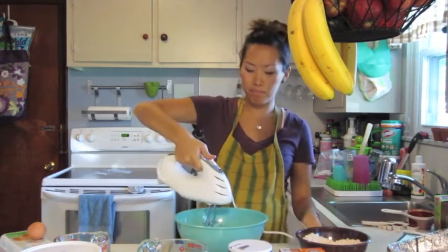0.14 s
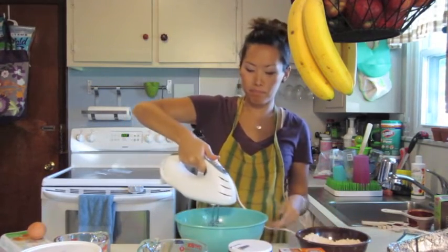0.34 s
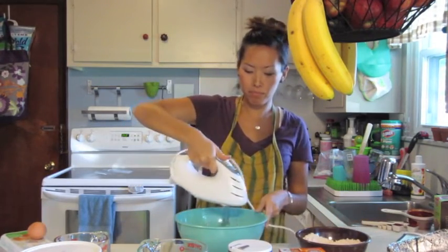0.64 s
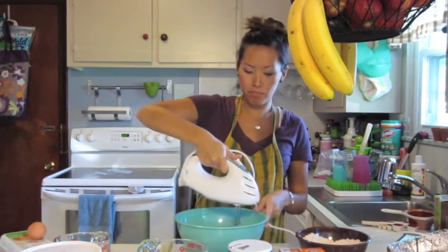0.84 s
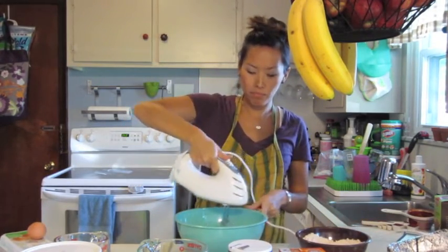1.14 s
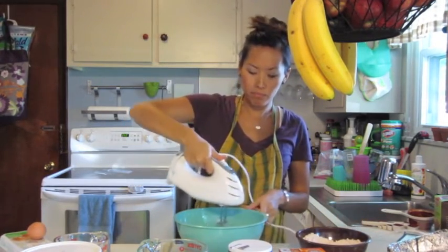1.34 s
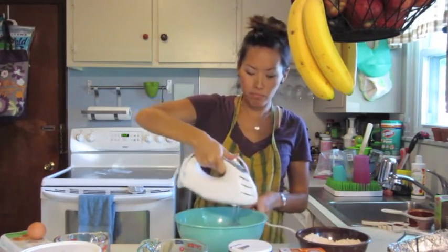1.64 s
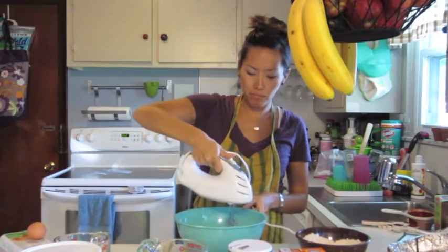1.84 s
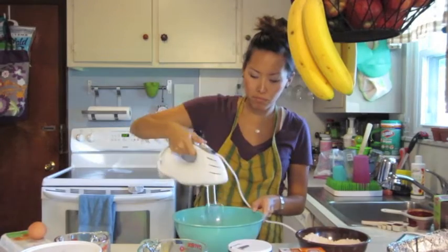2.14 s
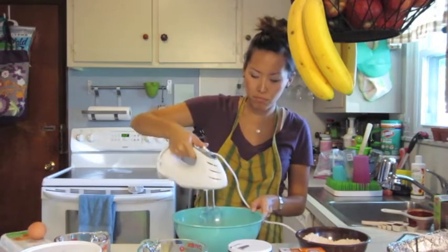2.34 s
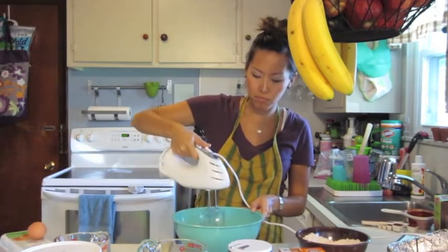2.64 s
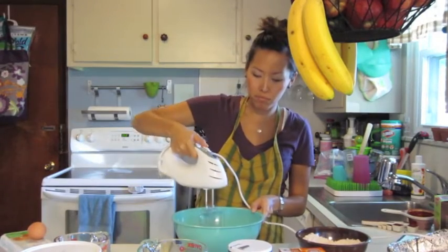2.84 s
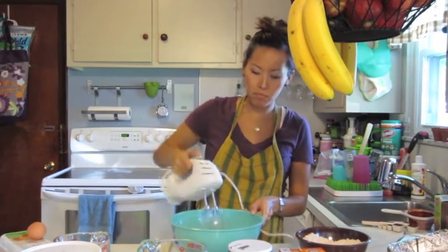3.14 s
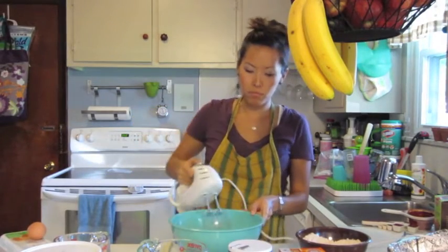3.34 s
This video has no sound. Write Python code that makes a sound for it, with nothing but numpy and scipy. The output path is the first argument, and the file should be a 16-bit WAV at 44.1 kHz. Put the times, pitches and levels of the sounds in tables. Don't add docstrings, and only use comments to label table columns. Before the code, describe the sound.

Faint kitchen hum, then at 0.1 s a switch clicks and a handheld mixer's motor whines upward, buzzing with gear noise and airy rush. From 0.8 to 2 s beaters knock rapidly on a plastic bowl, easing around 1.3 s, over low counter rumble. A quick fade at 2.07 s leads to a coasting motor; at 2.36 s it clicks on, revs until 2.83 s, then winds down with gear whir by 3.5 s.

```python
import sys
import numpy as np
from scipy import signal
from scipy.fft import rfft, irfft
from scipy.io import wavfile
from scipy.ndimage import uniform_filter1d

SR = 44100
rng = np.random.default_rng(int(sys.argv[2]) if len(sys.argv) > 2 else 0)


def invert_db(level):
    return 10 ** (np.asarray(level, dtype=float) / 20)


def put_to_file(sound):
    columns = np.atleast_2d(sound).T
    safe = np.clip(columns, -1, 1)
    whole_steps = np.round(safe * 32767)
    wavfile.write(sys.argv[1], SR, whole_steps.astype(np.int16))


N = 154350
JOIN_S = 2.069
MAINS_RIPPLE_HZ = 120.86


def level(x, db):
    return x * invert_db(db) / np.sqrt(np.mean(x ** 2))


def band(x, hz, width_hz):
    return signal.lfilter(*signal.iirpeak(hz, max(hz / width_hz, .6), fs=SR), x)


def shaped(x, points):
    point_hz, point_db = np.array(points, float).T
    hz = np.arange(N // 2 + 1) * SR / N + 1
    return irfft(rfft(x) * invert_db(np.interp(np.log(hz), np.log(point_hz), point_db)), N)


def coloured(points):
    return level(shaped(rng.standard_normal(N), points), 0)


def walk(rate_hz):
    hold = int(SR / rate_hz)
    steps = np.repeat(rng.standard_normal(N // hold + 1), hold)
    return 1.18 * uniform_filter1d(uniform_filter1d(steps, hold), hold)[:N]


def control(t, column):
    # time_s, whine_hz
    first_speed = [(0, 300), (.108, 300), (.15, 560), (.24, 700), (.3, 920), (.4, 1190), (.5, 1470),
                   (.6, 1650), (.75, 1840), (.9, 1960), (1.05, 2095), (1.2, 2190), (1.3, 2248), (1.4, 2298),
                   (1.49, 2345), (1.62, 2325), (1.8, 2364), (2.07, 2380)]
    # rush_db, gear_db, whine_db
    first_levels = [(-52.5, -47, -83), (-71, -56.5, -69), (-66, -37.5, -38), (-43, -29.5, -28),
                    (-49.5, -33.5, -31), (-45.5, -35, -31.5), (-43.5, -36.5, -33.5), (-41.5, -31.5, -34.5),
                    (-41.5, -31, -35.5), (-38.5, -32, -33.5), (-39, -34.5, -35.5), (-39, -30.5, -31),
                    (-37.5, -30, -33.5), (-36.5, -30.5, -30), (-36.5, -29.5, -32.5), (-34, -29.5, -34.5),
                    (-36.5, -31, -34.5), (-35.5, -25, -29.5)]
    # time_s, whine_hz
    second_speed = [(2.07, 900), (2.2, 700), (2.358, 700), (2.366, 860), (2.44, 1150), (2.53, 1570),
                    (2.6, 1780), (2.7, 2080), (2.78, 2330), (2.83, 2450), (2.9, 2350), (3.05, 1900),
                    (3.2, 1450), (3.35, 1000), (3.5, 600)]
    # rush_db, gear_db, whine_db
    second_levels = [(-51.5, -43, -66), (-54, -40.5, -78), (-65.5, -48, -52), (-46.5, -39, -32.5),
                     (-49.5, -39.5, -31.5), (-45, -36.5, -32), (-42, -33.5, -31.5), (-40, -30, -33),
                     (-37.5, -31.5, -32.5), (-37, -29, -42), (-40.5, -32.5, -52), (-44, -34, -67),
                     (-49, -34.5, -80), (-54, -42, -80), (-64, -46.5, -80)]
    axis = ["time_s", "whine_hz", "rush_db", "gear_db", "whine_db"].index(column)
    a = np.hstack([first_speed, first_levels])
    b = np.hstack([second_speed, second_levels])
    return np.where(t < JOIN_S, np.interp(t, a[:, 0], a[:, axis]), np.interp(t, b[:, 0], b[:, axis]))


def room_tone():
    # freq_hz, density_db
    spectrum = [(25, -3), (70, -11.5), (152, 4.5), (331, 2.5), (660, 2.5), (979, -2), (2500, -17),
                (16000, -38)]
    return level(coloured(spectrum), -43)


def mains_hum(ripple, on):
    motor_db, fridge_db = -45, -47
    return (on * invert_db(motor_db) + invert_db(fridge_db)) * invert_db(2.2 * walk(6)) * np.sin(2 * ripple)


def gears(t):
    # freq_hz, width_hz, level_db
    housing = [(245, 60, -13), (420, 120, -10), (520, 60, -5), (590, 36, -1), (673, 40, 1), (835, 70, -6),
               (996, 32, 2), (1130, 90, -6), (1410, 150, -11), (1740, 180, -8), (2200, 200, -12),
               (2900, 300, -15), (3400, 300, -19)]
    tooth_scatter_db = 2
    grip_hz, grip_db = 996, -5
    slow_dull_db = 2
    clicks = rng.standard_normal(N) * invert_db(tooth_scatter_db * rng.exponential(1, N)) * invert_db(1.5 * walk(60))
    slow_db = slow_dull_db * np.log2(control(t, "whine_hz") / 2300)
    body = 0
    for k, (hz, width_hz, db) in enumerate(housing):
        grip = grip_db * (hz == grip_hz) * (t < JOIN_S)
        dull = slow_db * max(np.log2(hz / 1000), 0)
        mode = band(band(clicks, hz, 2 * width_hz), hz, 2 * width_hz)
        body = body + (-1) ** k * invert_db(db + grip + 0.6 * walk(25.1) + dull) * mode
    return level(body, 0) * invert_db(control(t, "gear_db") + 2.5)


def rush(t, ripple, on):
    # freq_hz, density_db
    spectrum = [(60, -40), (300, -10), (1470, -9), (2600, -5), (3960, -11), (4900, -12), (5900, -9.5),
                (9700, -22.5), (16000, -20)]
    flicker_db, brush_gate = .8, .06
    edges_hz = [0, 1500, 3000, 5000, 8000, 11500, SR]
    air = rfft(coloured(spectrum))
    hz = np.arange(N // 2 + 1) * SR / N
    shared = walk(16)
    flow = 0
    for low, high in zip(edges_hz, edges_hz[1:]):
        flow = flow + irfft(air * (hz >= low) * (hz < high), N) * invert_db(flicker_db * (shared + walk(30.28)))
    return flow * (1 + brush_gate * on * np.sin(ripple)) * invert_db(control(t, "rush_db") + 3)


def ticks(t):
    # start_s, peak_db, tail_s, wire_ring_db
    events = [
        (0.1103, -38.5, 0.046, -58),
        (.21, -42, 0.034, -56),
        (0.319, -47, .015, -52),
        (0.366, -41.5, 0.013, -52),
        (.412, -41.5, .02, -49),
        (0.907, -43, .003, -42),
        (0.9668, -33.5, 0.018, -28.5),
        (1.58, -36, 0.011, -33),
        (2.363, -35.5, 0.035, -50),
        (3.2159, -41, .02, -43.5),
    ]
    # freq_hz, t60_s, level_db
    wire_modes = [(3050, .16, 0), (3280, .12, -2), (3750, .03, -1), (4300, .02, 0), (5900, .04, -6)]
    snap_db, snap_s = 4, .001
    shape, strikes, ring_s = np.zeros(N), np.zeros(N), t[:SR // 4]
    for start_s, db, tail_s, ring_db in events:
        since = np.abs(t - start_s)
        decay = np.exp(-since / tail_s) + invert_db(snap_db) * np.exp(-since / snap_s)
        shape += invert_db(db) * (t > start_s) * decay
        strikes[int(start_s * SR)] = invert_db(ring_db)
    wire = sum(invert_db(db - 60 * ring_s / t60) * np.sin(2 * np.pi * hz * ring_s) for hz, t60, db in wire_modes)
    noise = rng.standard_normal(N)
    snap = level(band(noise, 7500, 6000), -9.5) + level(band(noise, 2600, 3300), -5.5)
    return shape * snap + signal.fftconvolve(strikes, wire)[:N]


def counter(t):
    # time_s, level_db
    shake = [(.2, -62), (.26, -47.5), (.6, -39), (.8, -39), (.98, -35.5), (1.3, -42), (1.5, -38),
             (1.7, -31), (1.9, -38.5)]
    # freq_hz, width_hz, level_db
    resonances = [(31.3, 8.1, -5), (70.3, 15.6, 2.5), (90, 7.3, -7), (174, 34, -9.5)]
    thrum = 0
    for hz, width_hz, db in resonances:
        thrum = thrum + invert_db(db) * band(band(rng.standard_normal(N), hz, width_hz), hz, 2 * width_hz)
    time_s, shake_db = np.transpose(shake)
    gate = (t < JOIN_S) * np.clip((t - .12) / 0.08, 0, 1)
    return level(thrum, 0) * invert_db(np.interp(t, time_s, shake_db)) * gate


def whine(t, ripple):
    sidebands = [-14, -12, -7, -3, 0, -7, -15]
    # freq_hz, width_hz, level_db
    resonances = [(660, 102, 8.5), (890, 80, 2.5), (1004, 70, 5.5), (1138, 76, 5), (1418, 41, -3.5),
                  (1543, 46, 3), (1780, 170, 5.5), (1932, 67, 0.5), (2130, 91, 1.5), (2270, 98, 3),
                  (2387, 110, 6), (2650, 110, -4)]
    wander_db, floor_db, jitter, load_spread = 2, -10, .04, .5
    octave_db, octave_fades_hz = -7, 1450
    hz = control(t, "whine_hz")
    slew_hz_per_s = np.abs(uniform_filter1d(np.gradient(hz) * SR, size=4000))
    unsteady = np.clip(slew_hz_per_s / 2500, .02, 1) ** 1.15
    spread = 1 - load_spread * unsteady ** .5 * np.clip(hz / octave_fades_hz - .5, 0, 1)
    octave_gain = np.clip((octave_fades_hz - hz) / 150, 0, 1)
    tone = 0
    for k, db in enumerate(sidebands, start=-4):
        db = db * spread
        phase = 2 * np.pi * np.cumsum(hz * (1 + jitter * unsteady * walk(80))) / SR
        tone = tone + invert_db(db + wander_db * walk(21.48)) * np.sin(phase + k * ripple)
        octave = invert_db(db + octave_db + wander_db * walk(24.9)) * np.sin(2 * phase + k * ripple)
        tone = tone + octave_gain * octave
    tone = tone * invert_db(control(t, "whine_db"))
    body = sum(invert_db(db - 3.5) * band(tone, f, width_hz) for f, width_hz, db in resonances)
    return invert_db(floor_db) * tone + body


def squeal(t):
    start_s, end_s, ramp_s = 0.18, 0.372, 0.047
    gate = np.clip(np.minimum(t - start_s, end_s - t) / ramp_s, 0, 1)
    return gate * level(band(rng.standard_normal(N), 7300, 300), -47.5)


def bowl(t):
    # start_s, peak_db, wall_pitch_hz
    knocks = [(0.829, -14, 660.0), (0.849, -18, 735), (0.856, -11.5, 544), (0.886, -13, 655),
              (0.895, -16.0, 600), (0.915, -16, 630), (0.946, -8, 648), (0.975, -8.5, 697),
              (0.984, -15.5, 694), (1.002, -15.5, 630.0), (1.024, -22, 660), (1.041, -14.5, 623),
              (1.059, -28, 660.0), (1.075, -10, 612), (1.099, -17, 590), (1.107, -19, 638),
              (1.129, -19, 617), (1.153, -17, 637), (1.169, -17, 656), (1.2, -21, 630.0),
              (1.234, -18.5, 663), (1.245, -19, 650.0), (1.261, -33, 600.0), (1.329, -23, 640),
              (1.341, -20.0, 613), (1.356, -22, 540), (1.429, -22.0, 720), (1.461, -28, 730.0),
              (1.481, -18.5, 610), (1.498, -15.5, 719), (1.525, -14, 735), (1.542, -9.5, 629),
              (1.57, -13.0, 706), (1.585, -9.5, 615), (1.595, -18.5, 660.0), (1.611, -11.5, 690),
              (1.641, -12, 660.0), (1.65, -17, 766), (1.667, -9, 640), (1.681, -12.5, 656),
              (1.69, -16, 746), (1.704, -12.5, 620.0), (1.713, -19, 665), (1.736, -10.5, 620.0),
              (1.751, -29, 610), (1.76, -20, 590.0), (1.779, -18.0, 642), (1.79, -17.0, 630),
              (1.798, -19, 693), (1.822, -17.5, 780.0), (1.836, -23, 683), (1.849, -10.5, 631),
              (1.858, -21, 650.0), (1.879, -12.5, 590.0), (1.905, -14.0, 670.0), (1.92, -12, 633),
              (1.937, -20, 614), (1.952, -14.5, 640.0), (1.963, -15, 602), (1.987, -13, 620.0)]
    # freq_hz, level_db, t60_s
    modes = [(165.2, -11, 0.85), (253, 1.5, 0.065), (297, -1, 0.071), (472.5, -7.5, 0.15), (554, 6, 0.053),
             (590, 1.5, 0.058), (682, -1.5, 0.072), (757, -14, 0.064), (814, 5, 0.11), (1130, -43, 0.034),
             (3020, -5, 0.026), (5760, -28, 0.033)]
    rise_s, fall_s, thump_db = .0022, .0035, -4.5
    ring_db, ring_rise_s, phase_scatter = -18, .003, .1
    scrape_db, scrape_s = -16, 0.029
    out, push, ring_s = np.zeros(N), np.zeros(N), t[:SR // 5]
    mode_hz, mode_db, mode_t60_s = np.transpose(modes)[..., None]
    chance = rng.standard_normal((len(knocks), len(modes), 3))
    late = ring_s - 3 * rise_s
    swell = np.exp(-np.where(late < 0, (late / rise_s) ** 2, (late / fall_s) ** 2) / 2)
    scrape_decay = (late > 0) * np.exp(-np.abs(late) / scrape_s)
    for (start_s, db, wall_hz), c in zip(knocks, chance):
        detuned_hz = mode_hz * (1 + 0.017 * c[:, :1])
        tone = np.sin(2 * np.pi * (detuned_hz * ring_s + phase_scatter * c[:, 1:2]))
        ring = (invert_db(mode_db + 1.8 * c[:, 2:]) * tone * invert_db(-60 * ring_s / mode_t60_s)).sum(axis=0)
        ring = ring * (1 - np.exp(-ring_s / ring_rise_s)) * invert_db(ring_db)
        thump = invert_db(thump_db) * swell * np.sin(2 * np.pi * wall_hz * ring_s)
        at = int((start_s - 3 * rise_s) * SR)
        out[at:at + len(ring_s)] += (ring + thump) * invert_db(db)
        push[at:at + len(ring_s)] += invert_db(db) * scrape_decay
    noise = rng.standard_normal(N) * invert_db(1.6 * walk(90))
    scrape = sum(invert_db(db) * band(band(noise, hz, 6 / t60 + 0.042 * hz), hz, hz) for hz, db, t60 in modes)
    return out + level(scrape, scrape_db) * push


def kitchen_echo(t, dry):
    t60_s, echo_db = .3, -13
    tail_s = t[:SR // 2]
    decay = invert_db(-60 * tail_s / t60_s) * (tail_s > .006)
    echo = level(band(rng.standard_normal(len(tail_s)), 1760, 3600 ) * decay, 0)
    echo = echo * invert_db(echo_db) / np.sqrt(len(tail_s))
    first = t < JOIN_S
    wet_first = first * signal.fftconvolve(dry, echo)[:N]
    wet_second = signal.fftconvolve(dry * ~first, echo)[:N]
    return wet_first + wet_second


def scene():
    # start_s, end_s
    power = [
        (.11, 2.07),
        (2.362, 2.83),
    ]
    t = np.arange(N) / SR
    ripple = 2 * np.pi * MAINS_RIPPLE_HZ * t
    on = uniform_filter1d(sum(1. * (t > start_s) * (t < end_s) for start_s, end_s in power), size=900)
    mixer = gears(t) + rush(t, ripple, on) + whine(t, ripple)
    dry = mains_hum(ripple, on) + mixer + ticks(t) + squeal(t) + bowl(t)
    return (dry + kitchen_echo(t, dry) + counter(t) + room_tone())[None]


def low_pass(x):
    return signal.sosfilt(signal.butter(12, 15830, fs=SR, output="sos"), x)


def record(dry):
    # freq_hz, gain_db
    mic = [(9800, 1), (10800, -10), (11700, -20.5), (13200, -11.5), (14200, -19), (15200, -19),
           (15700, -24)]
    fade_out_s, fade_in_s = 0.092, 0.088
    t = np.arange(N) / SR
    fade = np.clip(np.maximum((JOIN_S - t) / fade_out_s, (t - JOIN_S) / fade_in_s), .01, 1)
    return low_pass(shaped(dry[0], mic)[None] * fade)


dry = scene()
out = record(dry)
put_to_file(out)
```